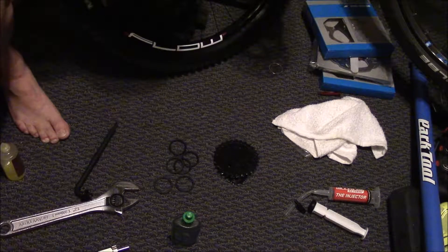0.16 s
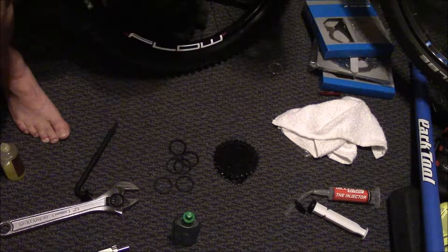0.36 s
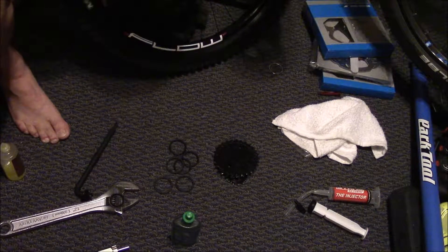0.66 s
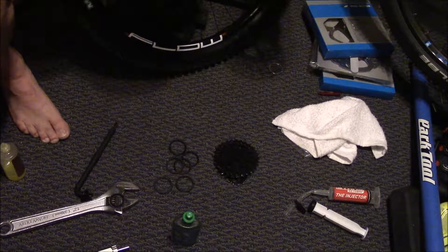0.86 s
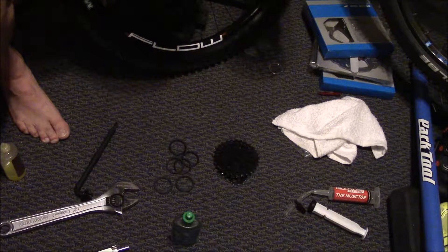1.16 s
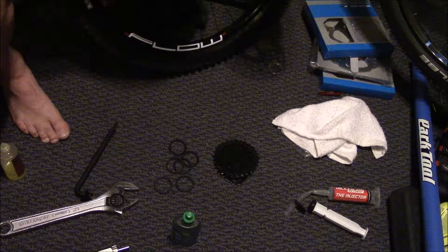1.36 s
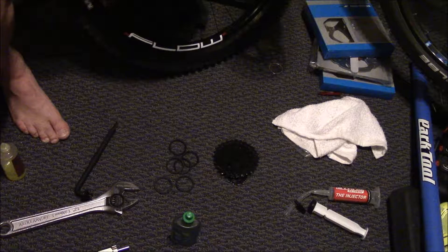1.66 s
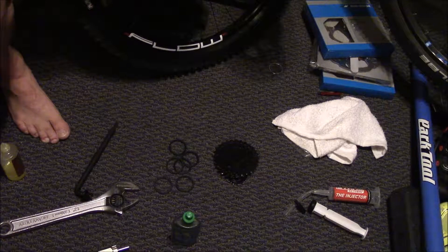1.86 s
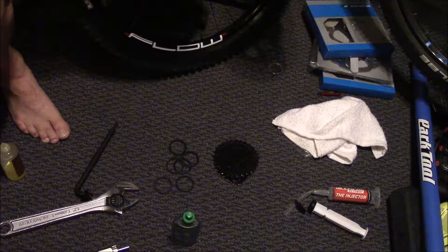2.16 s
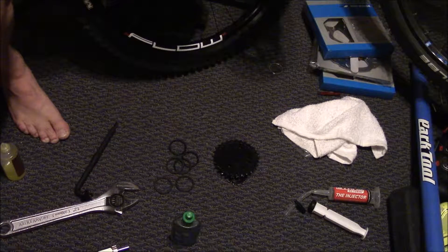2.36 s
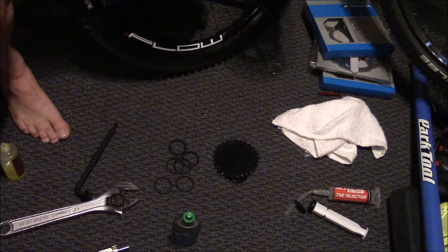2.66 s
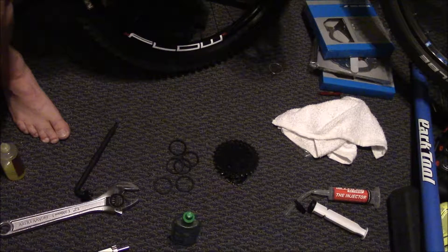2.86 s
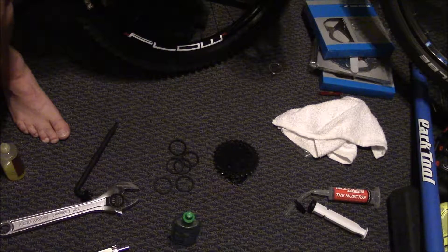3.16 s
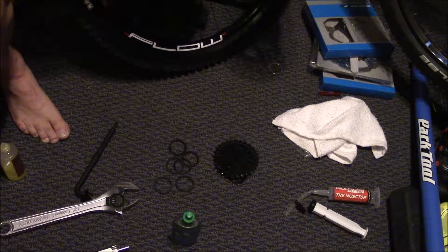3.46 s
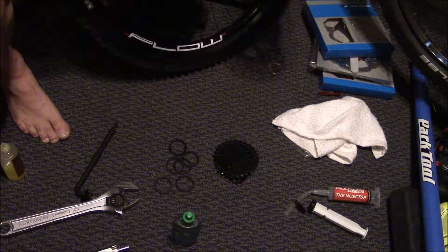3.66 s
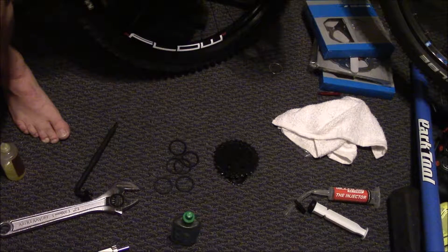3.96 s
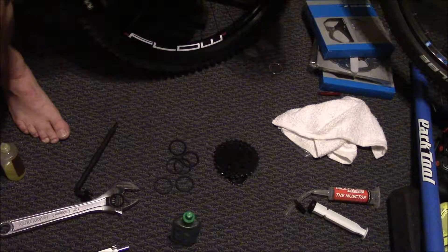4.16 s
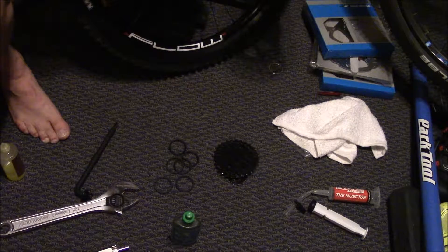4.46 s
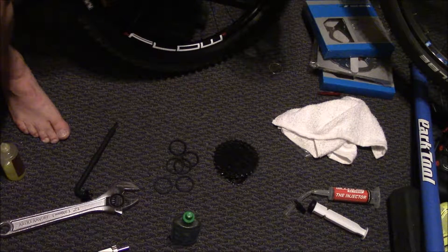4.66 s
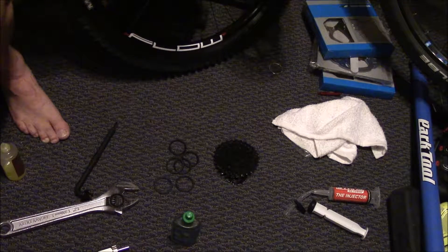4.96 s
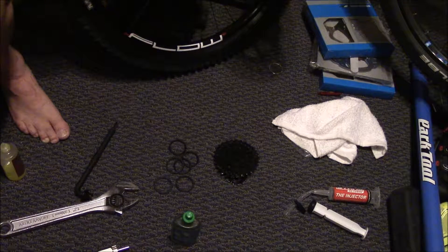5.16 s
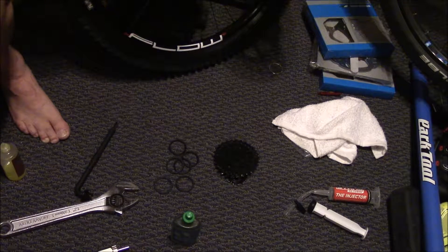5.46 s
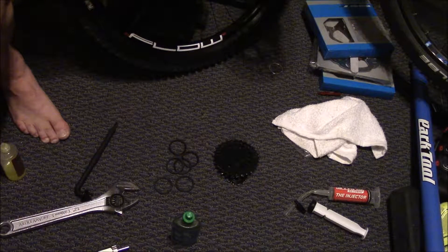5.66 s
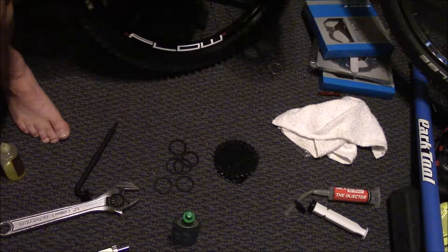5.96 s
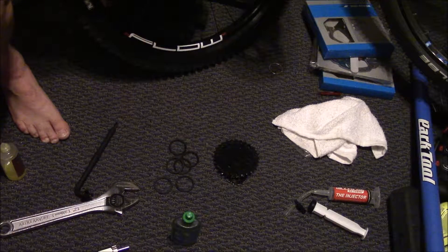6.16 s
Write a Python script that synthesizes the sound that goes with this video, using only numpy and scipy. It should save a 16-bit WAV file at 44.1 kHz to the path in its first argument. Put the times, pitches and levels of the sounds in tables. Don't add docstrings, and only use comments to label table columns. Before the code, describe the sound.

A small carpeted room, a stereo microphone about a metre from a bicycle wheel. Quiet low ventilation hum runs throughout, swelling gently, while soft low puffs of draught buffet the right side, strongest from 1 to 2.5 seconds. At 0 a thin skin-on-rubber hiss fades by 0.3, with a tiny tick near 0.18. Three hesitant freehub clicks come at 1.2-1.35, a faint soft seating at 1.56, then a rapid seven-click ratchet at 1.77-1.94. Six slower clicks follow at 2.4-2.7, a duller clack at 2.82, a quick seven-click run at 3.06-3.22, and six clicks at 3.57-3.78. A soft tick at 3.88 precedes six clicks at 4.2-4.47. After a pause, seven uneven clicks fall from 5.15 to 5.89, then a faint knock at 5.95. Each click is sharp, bright and metallic, with pawls landing almost together and a short shimmering ring fading into hum until about 6.3.

```python
import sys
import numpy as np
from scipy import signal
from scipy.fft import rfft, irfft, next_fast_len
from scipy.io import wavfile
from scipy.ndimage import uniform_filter1d

SR = 44100
rng = np.random.default_rng(int(sys.argv[2]) if len(sys.argv) > 2 else 0)


def convert_level_to_amplitude(level_db):
    exponent = np.asarray(level_db, float) / 20
    return 10 ** exponent


def transcribe(signal):
    frames = np.atleast_2d(signal).T
    limited = np.clip(frames, -1, 1)
    pcm = np.round(limited * 32767).astype(np.int16)
    wavfile.write(sys.argv[1], SR, pcm)


N = 278529
TOP_HZ = 15750


def level(x, db):
    return x * convert_level_to_amplitude(db) / np.sqrt(np.mean(x ** 2))


def along(table, hz):
    f, v = np.transpose(table)[:2]
    return np.interp(np.log(hz + 1), np.log(f), v)


def shape(x, db_at):
    n = next_fast_len(x.shape[-1])
    gain = convert_level_to_amplitude(db_at(np.fft.rfftfreq(n, 1 / SR)))
    return irfft(rfft(x, n) * gain, n)[..., :x.shape[-1]]


def walk(rate):
    k = int(SR / rate)
    steps = np.repeat(rng.standard_normal(N // k + 1), k)
    return 0.84 * uniform_filter1d(uniform_filter1d(steps, k), k)[:N]


def add(out, x, s):
    i = int(s * SR)
    out[i:i + len(x)] += x[:N - i]


def stereo(mid, side):
    return np.array([mid + side, mid - side])


# frequency in Hz, density in dB per Hz.
AIR_TONE = [(15, -62.5), (25, -38), (74, -15.5), (187, -15.5), (220, -3), (321, -15), (358, -1),
            (496, -7.5), (584, -8.5), (669, -15.5), (1090, -20.5), (2330, -30.5), (7710, -42.5),
            (14800, -52.5), (16500, -71.5)]
AIR_LEVEL_DB = -39
# frequency in Hz, side minus mid in dB.
AIR_WIDTH = [(60, -6), (110, -18), (200, -23.5), (380, -28), (700, -17), (1290, -16.5), (2380, -11.5),
             (4400, -10.5), (8120, -9.5), (15000, -14.5)]
# frequency in Hz, width in Hz, level in dB.
DUCT_TONES = [(123.2, 20, -58), (172, 41, -52), (216.5, 35, -50), (301.5, 34, -52), (358.9, 39, -46.5),
              (419.6, 31, -54), (509, 44, -57), (594, 53, -56.5), (1147, 235, -59)]
# time in seconds, flow in dB.
DUCT_FLOW = [(0, -9.5), (.61, -0.5), (.81, -4), (1.16, -1), (1.78, 2), (2.11, -5.5), (2.44, 3), (2.9, -0.5),
             (3.24, 2.5), (3.4, 0), (3.83, 6.5), (4.08, -1.5), (4.55, 2), (5.19, -2), (5.61, .5), (6.32, 1)]


def ventilation():
    flow_db = np.interp(np.arange(N) / SR, *np.transpose(DUCT_FLOW))
    air = shape(rng.standard_normal((2, N)), lambda f: along(AIR_TONE, f))
    pair = level(air, AIR_LEVEL_DB - 4.5) * convert_level_to_amplitude(0.68 * walk(1.8))
    for hz, width, db in DUCT_TONES:
        resonance = lambda f: -20 * np.log10(1 + (2 * (f - hz) / width) ** 2)
        band = shape(rng.standard_normal((2, N)), resonance)
        swell = 0.13
        if 190 < hz < 450:
            swell = 0.89 if hz < 260 else 0.69
        pair = pair + level(band, db) * convert_level_to_amplitude(swell * flow_db + walk(2.55))
    side = shape(pair[1], lambda f: along(AIR_WIDTH, f) - 25 * (f > 12300))
    return stereo(pair[0], side)


# time of the peak in seconds, peak level in dB, length in seconds.
GUST_PEAKS = [(.08, -56, .15), (.35, -47, 0.28), (.64, -46, 0.11), (.79, -47, .14), (1.025, -36.5, .12),
              (1.076, -32.5, 0.1), (1.175, -41.5, 0.25), (1.43, -35.5, 0.13), (1.665, -33.5, 0.12),
              (1.8, -36.5, 0.37), (2.27, -28.5, 0.1), (2.41, -34.5, 0.37), (2.484, -27, 0.11),
              (2.58, -52, .25), (3.05, -41, 0.22), (3.305, -42.5, .17), (3.46, -51, 0.32),
              (3.663, -51, 0.14), (3.914, -45, .2), (4.03, -39, 0.11), (4.308, -49.5, 0.57),
              (4.666, -43, 0.17), (4.92, -44, 0.092), (5.98, -43, .5), (6.235, -40, .14)]


def gusts():
    calm_db, rise_share, depth_db = -59, 0.45, 22
    t, power = np.arange(N) / SR, convert_level_to_amplitude(2 * calm_db)
    for s, db, length in GUST_PEAKS:
        away = np.where(t < s, (s - t) / rise_share, (t - s) / (1 - rise_share)) / length
        power = power + convert_level_to_amplitude(2 * (db - depth_db * away))
    return np.sqrt(power)


def draught():
    tone = [(20, -49), (45, -17), (85, 1.5), (130, 1.5), (210, 0.5), (400, -17.0), (800, -36), (2000, -67)]
    puffs = shape(rng.standard_normal((2, N)), lambda f: along(tone, f))
    puffs = puffs / np.sqrt(uniform_filter1d(puffs ** 2, 2000, axis=1))
    puffs[0] += .45 * puffs[1]
    return puffs * gusts() * convert_level_to_amplitude([[-9.], [-1.5]])


# time in seconds, level in dB.
HAND_SLIDE = [
    (0.0, -59),
    (0.008, -57),
    (0.21, -60.5),
    (0.258, -66),
    (0.298, -84),
    (0.36, -81),
]


def hand():
    grainy = rng.standard_normal(N) * convert_level_to_amplitude(1.5 * walk(58))
    tone = [(1500, -29.5), (3000, 1.5), (6000, -1.5), (10500, -2.5), (14000, -9.0), (15500, -24)]
    hiss = level(shape(grainy, lambda f: along(tone, f)), 0.5)
    s, db = np.transpose(HAND_SLIDE)
    return hiss * convert_level_to_amplitude(np.interp(np.arange(N) / SR, s, db, right=-120))


# start in seconds, peak level in dB, pitch in Hz.
PLAY_KNOCKS = [
    (.1755, -41, 3480),
    (.216, -50, 3200),
    (5.955, -39, 3700),
]


def knocks():
    out, t = np.zeros(N), np.arange(2048) / SR
    for s, db, hz in PLAY_KNOCKS:
        burst = rng.standard_normal(len(t)) * np.exp(-t / 0.0069)
        tick = shape(burst, lambda f: -10 * np.log10(1 + ((f - 1.07 * hz) / 700) ** 4))
        add(out, convert_level_to_amplitude(db) * tick / np.abs(tick).max(), s)
    return out


TINT_HZ = [1500, 3500, 6200, 9000, 13000]
# frequency in Hz, t60 in seconds, density in dB per Hz.
ROOM_MODES = [(690, 0.3, -3), (1100, 0.49, -8), (1770, 0.45, -1), (2486, 0.22, -3.5), (3920, 0.36, -2),
              (5180, 0.15, -4), (7140, 0.35, -5.5), (8730, 0.27, -1.5), (12120, 0.26, -9.5),
              (15530, 0.23, -15)]
# frequency in Hz, width in Hz, height in dB.
SHELL_HUMPS = [(1016, 147, 7), (1244, 54, 7.5), (1876, 93, 5.5), (2680, 320, 6), (3280, 140, 6),
               (4400, 270, 0.5), (5900, 145, 8), (6930, 180, 6.5), (7400, 333, 1.5), (8350, 350, 6.5),
               (8540, 220, 5.5), (9020, 136, 11), (9520, 250, -8), (10150, 220, 2), (11120, 200, 7),
               (11550, 294, 2.5)]


def afterring(times, tints):
    hz, t60, density = np.transpose(ROOM_MODES)
    build = 0.0018 * SR

    def colour(f):
        humps = sum(db / (1 + (2 * (f - c) / w) ** 2) for c, w, db in SHELL_HUMPS)
        return along(np.c_[hz, density], f) + humps - 14 * (f < 890) - 40 * (f > TOP_HZ + 100)

    noise = level(shape(rng.standard_normal((2, N)), colour), -21.0)
    out = 0
    for k in range(len(hz)):
        energy = np.zeros(N)
        energy[(times * SR).astype(int)] = [convert_level_to_amplitude(2 * along(np.c_[TINT_HZ, c], hz[k])) for c in tints]
        energy = signal.lfilter([1], [1, -convert_level_to_amplitude(-120 / t60[k] / SR)], energy)
        energy = signal.lfilter([1 / build], [1, 1 / build - 1], energy)
        share = np.c_[hz, np.arange(len(hz)) == k]
        band = shape(noise, lambda f: 20 * np.log10(along(share, f) + 1e-6))
        out = out + np.sqrt(energy) * band
    return out


# frequency in Hz, level in dB re tooth, t60 in seconds.
BELL_MODES = [(1989, -36, .2), (3424, -38, .15), (3922, -39, .2), (4410, -42, .18), (5997, -36, .2),
              (7294, -36, .18), (8260, -31, .16), (8413, -32, .15), (9069, -31, .15), (3757, -39, .2),
              (10028, -33, .1)]


def bell(times, tints):
    out, chance = 0, rng.standard_normal((len(times), len(BELL_MODES), 2))
    for k, (hz, db, t60) in enumerate(BELL_MODES):
        blows = np.zeros(N, complex)
        tint_db = np.array([along(np.c_[TINT_HZ, c], hz) for c in tints])
        size = convert_level_to_amplitude(db + tint_db + 2.8 * chance[:, k, 0])
        blows[(times * SR).astype(int) + 40] = size * np.exp(3j * chance[:, k, 1])
        pole = convert_level_to_amplitude(-60 / t60 / SR) * np.exp(2j * np.pi * hz / SR)
        out = out + signal.lfilter([1], [1, -pole], blows).imag
    return out


# frequency in Hz, level in dB, t60 in seconds.
HUB_MODES = [(967, -19.5, 0.066), (1243, -25, .05), (1582, -19, 0.17), (1878, -15.5, 0.064),
             (1968, -10, 0.12), (2838, -4.5, 0.042), (3072, -6, 0.05), (3434, -1, 0.054),
             (3760, -34, 0.0226), (3790, -27, 0.037), (4135, 2, 0.027), (4504, -8, 0.049),
             (4840, -11.5, 0.065), (5020, -13, 0.025), (6040, -3.5, 0.028), (7010, -3, 0.08),
             (7960, -21, .03), (7510, -4, 0.06), (8230, -5, 0.11), (8310, -2, 0.076), (8400, 2, .03),
             (8950, -3.5, 0.02), (9600, -9, 0.022), (10025, 8, 0.021), (11000, -5.5, 0.062),
             (11540, -1, 0.041), (13100, -10, .02), (14000, -21, 0.018)]
# frequency in Hz, density in dB per Hz.
CRACK_TONE = [(470, -21), (900, -19), (2300, -17), (3200, -9.5), (5200, -8), (7200, -3.5), (9000, -0.5),
              (12000, -3.5), (14500, -1), (15700, -17), (16500, -38)]


def snap(tint_db):
    land_s, spread_s, rise_s = 0.0016, 0.002, 0.00052
    t = np.arange(3072) / SR
    tint = np.c_[TINT_HZ, tint_db]
    hz, db, t60 = np.repeat(np.transpose(HUB_MODES), 2, axis=1)[:, :, None]
    chance = rng.standard_normal((3, len(hz), 1))

    since = np.maximum(t - land_s - spread_s * rng.random((len(hz), 1)), 0)
    size = convert_level_to_amplitude(db + along(tint, hz) + 2.0 * chance[0]) * (1 - np.exp(-since / rise_s))
    decay = np.exp(-np.log(1000) * since / t60)
    wave = np.sin(2 * np.pi * (hz + 30 * chance[1]) * t + 3 * chance[2])
    ring = (size * decay * wave).sum(0)

    landed, lifted = np.maximum(t - land_s, 0), t - .001
    push = (1 - np.exp(-landed / rise_s)) ** 2 * np.exp(-landed / 0.0029)
    push = push + convert_level_to_amplitude(-26.0) * (lifted > 0) * np.exp(-np.abs(lifted) / .0005)
    crack = shape(rng.standard_normal(len(t)) * push, lambda f: along(CRACK_TONE, f) + along(tint, f))

    x = ring / np.linalg.norm(ring[:512]) + convert_level_to_amplitude(1.0) * crack / np.linalg.norm(crack)
    return x * np.minimum(1, (t[-1] - t) / .02) / np.abs(x).max()


# start in seconds,
# peak, weight and edge in dB.
TEETH = [(1.7701, -11, -2, 2.5), (1.7933, -9.5, 7, 0), (1.8194, -9.5, 2, -1), (1.8481, -10, -3, -2),
         (1.8756, -10.5, 3.5, .5), (1.9035, -11.5, -3, 1), (1.943, -9.5, -5.5, -3),
         (3.064, -10, -6, -2), (3.0972, -11.5, 3, 6.5), (3.122, -10, -9, 1), (3.1439, -11, 7, 5.5),
         (3.1673, -10, -9, 4), (3.192, -10, -5, -8), (3.2208, -10, -10, -1), (3.5743, -11.5, 0.5, 3),
         (3.611, -10.5, -12, 3), (3.6465, -11, -1, -5), (3.6874, -10.5, 2.5, 4),
         (3.726, -11.5, -11, 4), (3.7761, -9.5, -5, -6.5), (4.2031, -11, -2, -2),
         (4.2532, -10.5, -6, -6), (4.2984, -10.5, -9, 1), (4.338, -12, -2.5, 0),
         (4.3846, -11.5, 1, 6.5), (4.4731, -11, -2.5, -3),
         (1.2142, -11.5, -4, 3), (1.265, -11.5, 2, 5.5), (1.3533, -12.5, -1, 9), (2.413, -12, 0.5, -2),
              (2.479, -11, 4, 2), (2.529, -11.5, -1, 2), (2.597, -11.5, 2, -4), (2.635, -10.5, 2, 0),
              (2.6841, -10.5, -8, -1.5), (5.1494, -10.5, 5.5, 1.5), (5.3425, -11.5, 2.5, 6.5),
              (5.4821, -11, 0, -2.5), (5.6639, -11.5, -8.5, -5), (5.735, -13.5, 10, 9),
              (5.7856, -10.5, 7.5, -1), (5.886, -11.5, 0, 5.5)]
# start in seconds, peak in dB, softness (1 = usual).
SOFT_SEATS = [
    (1.5602, -31.5, 1.15),
    (2.8195, -22.5, .75),
    (3.8766, -30, 1.2),
]
WEIGHT_TINT = [0.93, -0.23, -0.016, -0.024, -0.013]
EDGE_TINT = [0.046, 0.36, 0.86, 0, 1.03]
SOFT_TINT = [9, 24, 10, 0, -5]
# frequency in Hz, side minus mid in dB.
HUB_WIDTH = [(700, -25), (1500, -53), (2400, -51), (4400, -25.5), (8100, -10), (12000, -10), (15500, -19)]


def freehub():
    firm, soft = np.array(TEETH), np.array(SOFT_SEATS)
    firm_tints = firm[:, 2:] @ np.array([WEIGHT_TINT, EDGE_TINT])
    soft_tints = soft[:, 2:] * np.array(SOFT_TINT)
    rows = np.r_[firm[:, :2], soft[:, :2]]
    tints = np.r_[firm_tints, soft_tints]
    order = np.argsort(rows[:, 0])
    rows, tints = rows[order], tints[order]

    direct = knocks()
    for (s, db), tint in zip(rows, tints):
        add(direct, convert_level_to_amplitude(db - 1.0) * snap(tint), s - .0019)
    lasting = rows[:, 1:2] + 0.72 * (tints - tints.max(axis=1, keepdims=True) / 2)
    ring_mid, ring_side = afterring(rows[:, 0], lasting)
    direct = direct + bell(rows[:, 0], lasting)
    skew = signal.lfilter(rng.standard_normal(48) / np.sqrt(48), 1, direct)
    side = shape(convert_level_to_amplitude(-10.0) * skew + convert_level_to_amplitude(-1.5) * ring_side, lambda f: along(HUB_WIDTH, f))
    return stereo(direct + ring_mid, side)


def scene():
    return ventilation() + draught() + hand() + freehub()


def band_limit(x):
    return signal.sosfilt(signal.butter(12, 16810, fs=SR, output="sos"), x)


def record(dry):
    top_cut = signal.cheby2(14, 62, TOP_HZ + 1500, fs=SR, output="sos")
    mix = signal.sosfilt(top_cut, dry)
    return band_limit(mix)


dry = scene()
out = record(dry)
transcribe(out)
```